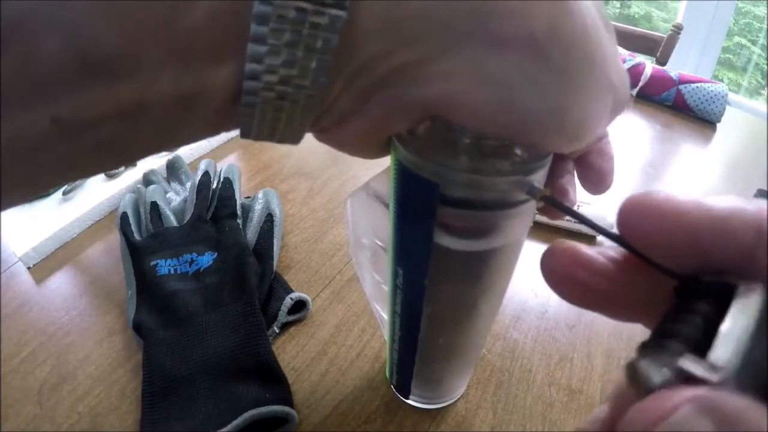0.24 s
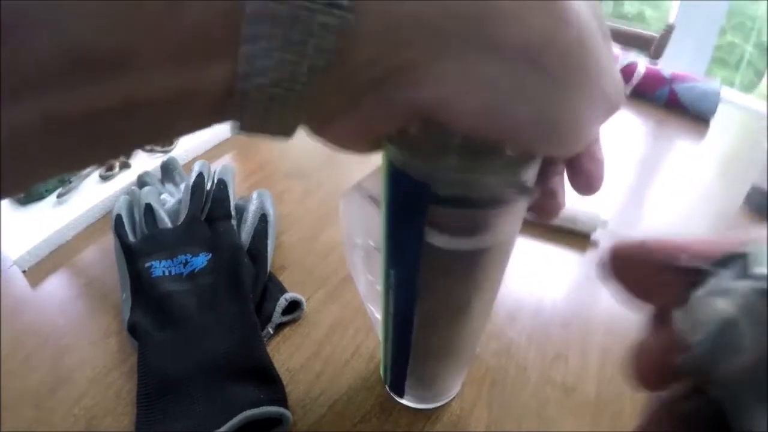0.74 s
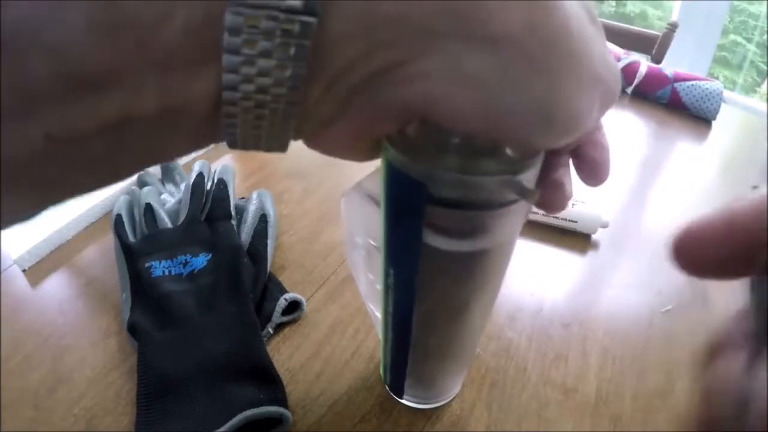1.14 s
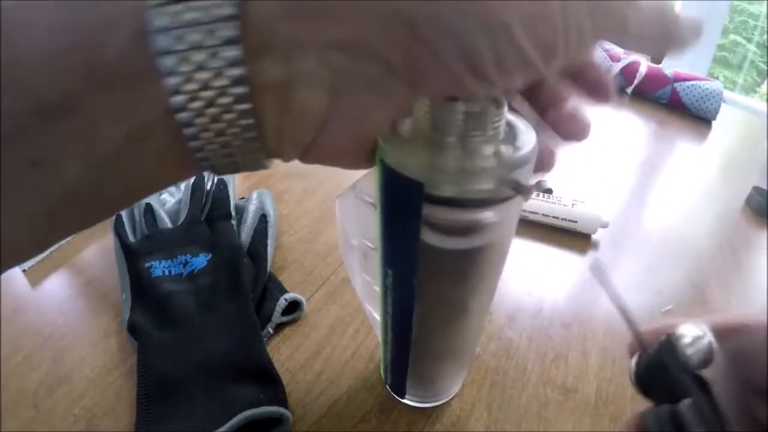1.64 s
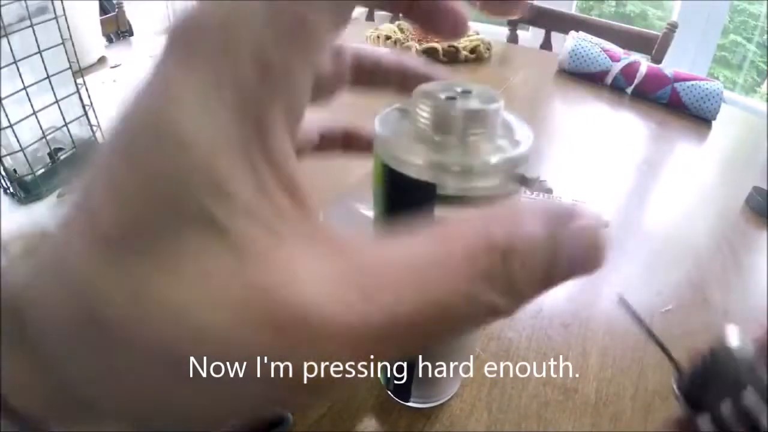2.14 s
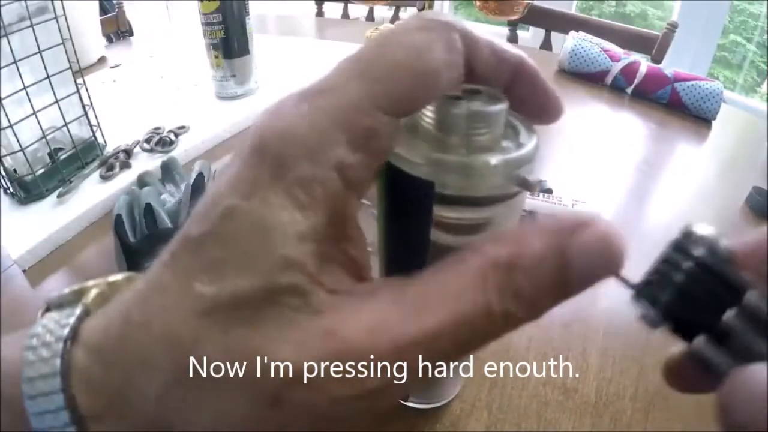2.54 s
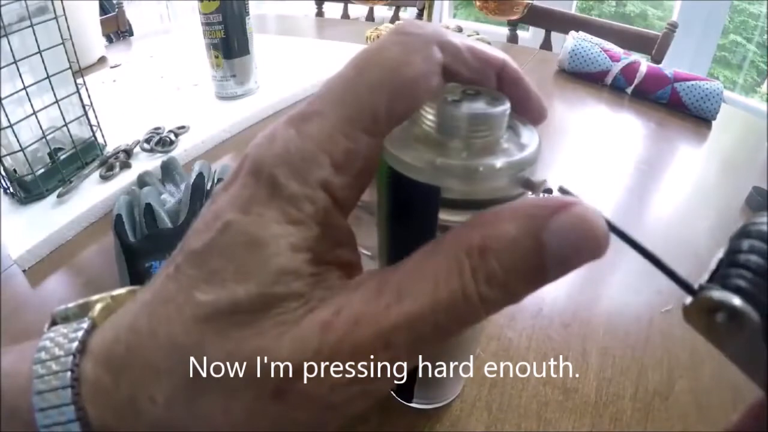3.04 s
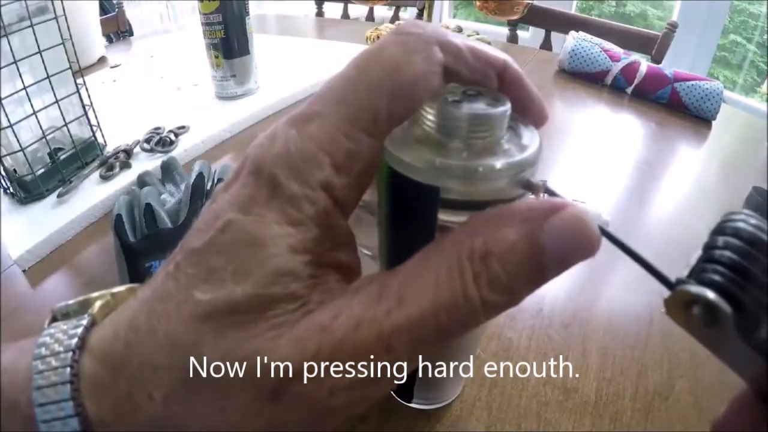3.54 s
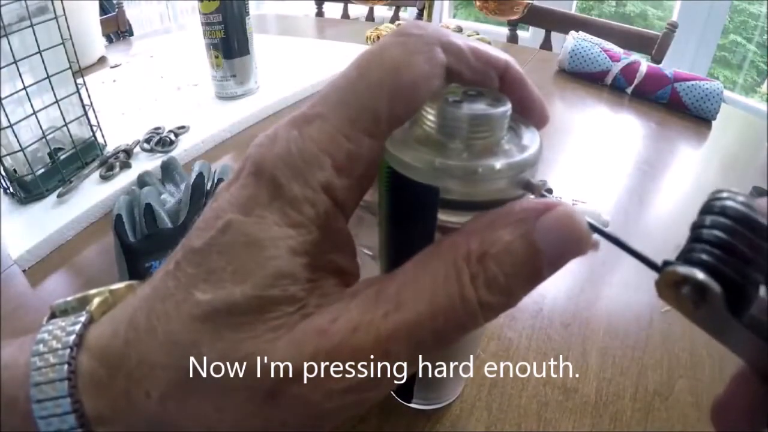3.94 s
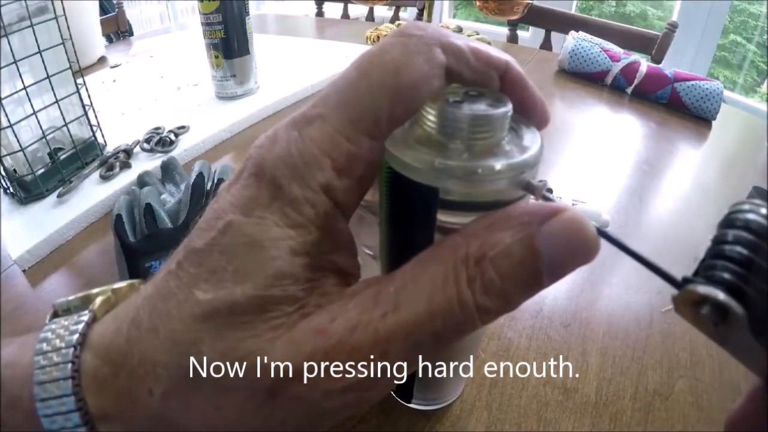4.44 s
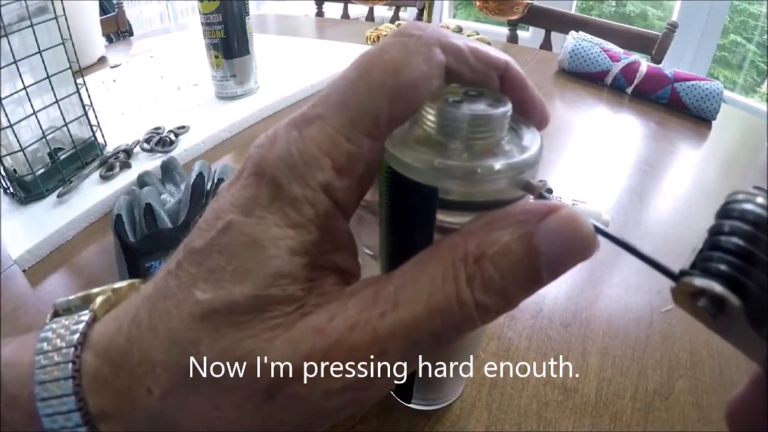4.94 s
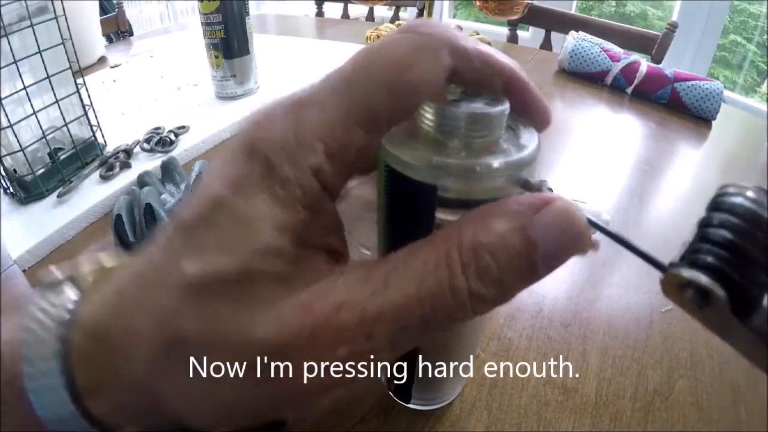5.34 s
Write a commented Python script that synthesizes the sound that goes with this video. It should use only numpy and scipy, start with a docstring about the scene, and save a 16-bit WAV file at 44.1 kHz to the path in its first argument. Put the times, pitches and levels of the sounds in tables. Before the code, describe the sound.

Faint metal clicks and scrapes of a hex key, a brief loud hollow bump close by, and soft table rumble indoors.

```python
"""In a quiet room, a hand works a folding hex key at a small screw on a plastic cap, beside a camera.
Brief contacts excite the steel's normal modes as ticks; stick-slip friction drives them as scrapes.
Knocks of the hand ring the hollow camera housing and crack against its shell.
Handling forces the table's low modes into a rumble, over a steady room tone."""
import sys
import numpy as np
from scipy import signal
from scipy.io import wavfile
from scipy.ndimage import uniform_filter1d

SR = 44100
rng = np.random.default_rng(int(sys.argv[2]) if len(sys.argv) > 2 else 0)


def int16_out(signal):
    """Quantize to a 16-bit WAV file."""
    q = np.round(np.clip(np.atleast_2d(signal).T, -1, 1) * 32767)
    wavfile.write(sys.argv[1], SR, q.astype(np.int16))


N = 246959

# normal modes of the steel key: f/Hz, nominal bandwidth/Hz, relative level/dB
STEEL_MODES = [(1300, 450, -5), (1900, 450, -5), (2550, 350, -3), (3200, 350, -2), (3850, 350, 0),
               (4600, 380, -1), (5200, 330, -1), (6200, 550, -4), (7500, 550, -5), (8600, 380, -1),
               (9800, 550, -5), (10600, 450, -5), (11600, 650, -4), (12900, 750, -3), (14300, 950, -5)]


def gain_of(db):
    return 10 ** (np.asarray(db) / 20)


def unit_rms(x):
    return x / np.sqrt(np.mean(x ** 2) + 1e-20)


def resonate(x, hz, width):
    """Resonance: two like damped oscillators in cascade, each of about unit gain at its peak."""
    r = np.exp(-np.pi * width / SR)
    for _ in range(2):
        x = 2 * signal.lfilter([1 - r], [1, -r * np.exp(2j * np.pi * hz / SR)], x).real
    return x


def coupling(hz, centre_hz, octaves):
    """Selective excitation: a mode's weight falls in a bell curve about the pitch driven hardest."""
    return np.exp(-.5 * (np.log2(hz / centre_hz) / octaves) ** 2)


def room_tone():
    """Ambient noise: a steady random spectrum with faint drifting patches."""
    # background spectrum: f/Hz, relative spectral level/dB
    spectrum = [(12, -28.5), (20, 8.5), (74, -4), (98, -13), (158, -16.5), (177, -9), (204, -20),
                (241, -16), (527, -26), (849, -24), (2460, -33.5), (14700, -46.5), (16000, -76)]
    frames, hz = N // 256 + 5, np.fft.rfftfreq(1024, 1 / SR)
    real, imag, patches = rng.standard_normal((frames, 513, 3)).T
    patches = unit_rms(uniform_filter1d(uniform_filter1d(patches, size=20, axis=0), size=8, axis=1))
    f, db = np.transpose(spectrum)
    colour_db = np.interp(np.log(hz + 1), np.log(f + 1), db)[:, None]
    bins = (real + 1j * imag) * gain_of(colour_db + 1.3 * patches)
    return gain_of(-52) * unit_rms(signal.istft(bins, nperseg=1024, noverlap=768)[1][:N])


def table_rumble():
    """Forced vibration: lumpy pushes drive the table's modes; bustle and jolts add in power."""
    # slow bustle of the hands: t/s, level/dB
    handling = [(0, -71), (.45, -60.5), (.62, -50.5), (1.05, -62.5), (1.5, -54), (1.7, -61.5), (1.85, -55),
                (2.25, -68), (2.36, -57.5), (2.9, -62.5), (3.1, -77), (4.9, -77.5), (5.1, -62),
                (5.4, -58.5), (5.6, -45)]
    # jolts of the table: t/s, level/dB, deep modes re upper modes/dB, T60/s
    jolts = [(0.256, -42, 0, 0.35), (0.502, -49, 7, 0.78), (.672, -45, 7, 0.78), (.728, -34.5, -5, 0.24),
             (.845, -31, 2.5, 0.2), (1.913, -48.5, 2, 1), (2.508, -45.5, 2, 0.58), (2.758, -48, -6, 0.46),
             (5.446, -46, 0.5, 0.35), (5.538, -41, 11.5, 0.43), (5.575, -41, -5, .4)]
    # modes of the table, the two deep ones first: f/Hz, nominal bandwidth/Hz, relative level/dB
    table_modes = [(73, 78, 4), (131, 24, 4), (213, 70, 3), (311, 52, 0.5), (430, 120, -17.5)]
    rise_s, bustle_deep_db = .006, 2.5
    t = np.arange(N) / SR
    bustle = gain_of(np.interp(t, *np.transpose(handling)))
    power = np.array([bustle, gain_of(bustle_deep_db) * bustle]) ** 2
    for s, db, deep_db, t60 in jolts:
        age = np.maximum(t - s, 0)
        decay = gain_of(np.array([[db], [db + deep_db]]) - 60 * age / t60)
        power += (np.minimum(age / rise_s, 1) * decay) ** 2
    upper_gain, deep_gain = np.sqrt(power)
    force = rng.standard_normal(N)
    force *= gain_of(3.5 * unit_rms(uniform_filter1d(rng.standard_normal(N), size=500)))  # lumps
    wood = [gain_of(db) * resonate(force, hz, 1.06 * width) for hz, width, db in table_modes]
    return upper_gain * unit_rms(sum(wood[2:])) + deep_gain * unit_rms(sum(wood[:2]))


def steel_ticks():
    """Impact excitation: a short gritty contact rings the steel modes around a low and a treble pitch."""
    # contacts: t/s, relative level/dB, low f/Hz, treble re low/dB, treble f/Hz, contact time scale/ms
    contacts = [(.2554, -38, 3480, -11, 8900, 0.39), (0.2617, -30, 3030, -13, 7600, 1.03),
                (.496, -40.5, 4340, 1, 12600, 1.4), (0.5037, -31, 5940, -0.5, 8440, 1.6),
                (0.5162, -39, 5740, 2.5, 8400, 1.7), (0.546, -50, 3980, -2, 8800, .8),
                (0.5585, -46.5, 3150, -22, 10100, 1.1), (.6819, -44, 3150, -7.5, 8500, 2.8),
                (.696, -47.5, 5500, -8, 9500, 1.4), (.7711, -35.5, 4500, -22, 9050, 0.61),
                (0.7787, -47, 3660, 3.5, 7800, 1.2), (0.809, -25.5, 2150, -24, 8450, 0.69),
                (0.875, -54, 3150, -3, 8450, 1), (0.899, -40.5, 3630, -4.5, 8450, 1.75),
                (.925, -45.5, 2750, -8, 9100, 0.73), (.9916, -38.5, 4140, -6.5, 8750, 1.5),
                (1.0932, -47, 3700, -11.5, 9100, 0.76), (1.1362, -41.5, 3280, -7, 7400, 1),
                (1.2087, -42, 2960, -2, 8000, 1.1), (1.2282, -45.5, 3670, -7, 8800, 0.69),
                (1.267, -47.5, 3590, -13, 8800, 1.6), (1.296, -38.5, 3600, -7.5, 8450, 1.8),
                (1.3368, -42.5, 3190, -14, 8300, 1.1), (1.3777, -39, 3240, -5, 8470, 4.1),
                (1.3928, -43, 4360, -26.5, 8550, 3.5), (1.422, -47, 3810, -29, 8140, 0.65),
                (2.117, -43.5, 3060, -5.5, 9400, 1.55), (2.2548, -43, 2800, -3, 7500, 2.1),
                (2.4364, -23.5, 4120, 1.5, 9800, 2), (2.501, -42, 2670, -20, 8800, 3),
                (2.5145, -46, 2780, -17, 8800, 1.1), (2.562, -48.5, 3100, -11, 8800, 3.9),
                (2.974, -52, 3170, -7, 8800, 1.42), (3.1188, -48.5, 3200, -20, 8800, 2.5),
                (5.018, -49, 5200, -15.5, 8300, 1.1), (5.0682, -34, 4740, -9, 9000, 1.9),
                (5.0742, -33.5, 2400, -14, 9000, 2.4), (5.1454, -54, 5880, -2.5, 8500, 1),
                (5.1744, -46, 5810, -4, 9670, 1.23), (5.1794, -32.5, 5100, -1, 8330, 0.65),
                (5.241, -44.5, 4880, -13.5, 8400, 1.2), (5.2769, -52, 4550, -11.5, 8900, 1.16),
                (5.382, -48.5, 1900, -20.5, 8800, 0.99), (5.3968, -47.5, 2700, -7.5, 11570, 2.5),
                (5.4163, -34.5, 4690, -8.5, 11500, 0.9), (5.474, -40, 4860, 0, 8860, 2.7),
                (5.491, -50, 5140, -9, 8200, 1.3), (5.546, -55, 5030, -2, 8200, 0.84)]
    low_octaves, treble_octaves, skirt_db = .54, .13, -16.5
    out, t = np.zeros(N), np.arange(1500) / SR
    grit = rng.standard_normal((len(contacts), len(t)))
    tunings = 1 + .04 * rng.uniform(-1, 1, (len(contacts), len(STEEL_MODES)))  # each tick sounds a different key of the set, its modes slightly shifted
    for (s, db, low_hz, treble_db, treble_hz, ms), noise, tuning in zip(contacts, grit, tunings):
        u = t * 1000 / ms
        force = noise * u ** 2 * np.exp(-3 * u)
        force *= 1 + .67 * np.exp(-((u - .8) / .15) ** 2)  # the hardest instant of the strike
        force += np.linalg.norm(force) / 300 * noise[::-1] * np.exp(-t / .01)  # faint room response
        modes = [(hz, gain_of(mode_db) * np.sqrt(w) * unit_rms(resonate(force, hz * shift, 1.8 * w)))
                 for (hz, w, mode_db), shift in zip(STEEL_MODES, tuning)]
        low = sum(coupling(hz, low_hz, low_octaves) * mode for hz, mode in modes[:8])
        treble = sum((coupling(hz, treble_hz, treble_octaves) + gain_of(skirt_db)) * mode
                     for hz, mode in modes[8:])
        tick = low / np.linalg.norm(low) + gain_of(treble_db) * treble / np.linalg.norm(treble)
        add(out, s, gain_of(db + 12.5) * tick)
    return out


def steel_scrapes():
    """Stick-slip friction: tiny uneven slips drive the steel modes, fading as the hand slows."""
    # strokes: t/s, duration/s, level before fading/dB, centre f/Hz, spread/octaves
    strokes = [(0.257, .1, -65.5, 2500, 1.3), (0.486, 0.11, -59, 5930, 1.6), (0.765, 0.029, -57, 4470, .74),
               (0.788, 0.15, -62, 3900, 0.56), (1.225, 0.079, -62, 4180, 0.9),
               (1.326, 0.059, -59.5, 4000, .72), (1.374, 0.045, -52, 4730, .68),
               (1.399, 0.1, -62.5, 2865, .57), (2.291, 0.38, -63.5, 1820, .53),
               (2.439, 0.091, -62.5, 9700, 0.48), (2.528, 0.046, -57.5, 2880, 0.26),
               (5.062, 0.072, -60, 3030, 1.1), (5.184, 0.074, -56.5, 6670, .55),
               (5.253, .066, -64, 6060, .7), (5.449, 0.09, -62.5, 8500, 0.77),
               (5.507, 0.23, -67, 5600, 0.88)]
    slips_per_s, rolloff_hz, fade_db = 2600, 10500, -3.5
    slips = gain_of(3.6 * np.minimum(rng.exponential(1, N), 5))
    slips *= (rng.random(N) < slips_per_s / SR) * rng.choice([-1, 1], N)
    modes = [(hz, gain_of(db) / (1 + (hz / rolloff_hz) ** 4) * resonate(slips, hz, 1.43 * width))
             for hz, width, db in STEEL_MODES]
    out = np.zeros(N)
    for s, duration, db, centre_hz, octaves in strokes:
        start = round(s * SR)
        u = np.linspace(0, 1, round(duration * SR))[:N - start]
        rub = sum(coupling(hz, centre_hz, octaves) * mode[start:][:len(u)] for hz, mode in modes)
        envelope = np.minimum(u / .12, 1) * np.minimum((1 - u) / .4, 1)
        add(out, s, gain_of(db + fade_db * u) * envelope * unit_rms(rub))
    return out


def housing_knocks():
    """Damped free vibration: a soft push rings the hollow housing, its rough edge sounds the shell."""
    # knocks: t/s, relative level/dB, thump gain/dB, crack gain/dB, damping factor of the grip
    knocks = [(0.2633, -47, 6, -9, 0.29), (.508, -48.5, 4, 2.5, 0.49), (.6775, -25.5, -13, -17, 0.54),
              (.684, -14.5, -11, -34, 5.4), (.7182, -14.5, -47, -16.5, 1.9), (.7203, -18.5, 11, -32, 2.8),
              (0.727, -35, 1.5, -20, 0.96), (0.8093, -1, -8.5, -24, 0.74), (0.8313, -11.5, 5.5, -15, 5.3),
              (0.8347, -17.5, -3.5, -19, 0.46), (0.8406, -6, -10.5, -29.5, 0.84),
              (0.846, -10.5, -14, -29, 2.2), (.850, -28, 2.5, -10.5, 1.6), (.857, -48.5, 15.5, -5, 2.5),
              (1.70, -49.5, 0, -24.5, 0.74), (2.513, -56, 7, -30, 1.5), (5.079, -48.5, 5, -3.5, 0.69),
              (5.448, -51, 15, -21.5, 1.5), (5.5496, -45.5, 16, -6, 1.9)]
    # five thump modes, then two cavity modes: f/Hz, relative level/dB, T60 at unit damping/s
    housing_modes = [(62.28, -12.5, 0.092), (170, -22.5, .06), (284, -9.5, 0.15), (405, -2, .04),
                     (435.1, -14, 0.15), (660, -4, 0.02), (801.4, 1, 0.045)]
    # shell resonances: f/Hz, nominal bandwidth/Hz, relative level/dB
    shell_modes = [(1272, 83, -4.5), (1612, 290, 2.5), (1940, 330, -3), (2180, 259.4, -2.5),
                   (2700, 320, -9), (3360, 440, -19)]
    out, t = np.zeros(N), np.arange(8000) / SR
    push = np.hanning(round(.0011 * SR))
    grit = rng.standard_normal((len(knocks), len(t))) * t * np.exp(-t / .00202)
    for (s, db, thump_db, crack_db, damping), noise in zip(knocks, grit):
        modes = [gain_of(mode_db - 60 * damping * t / t60) * np.sin(2 * np.pi * hz * t)
                 for hz, mode_db, t60 in housing_modes]
        swell = 1.8 * (1 - np.exp(-t / .00099))  # the air inside takes a cycle or two to build up
        swell *= np.exp(-(damping * t / .011) ** 2)  # the closing hand then smothers it
        hollow = swell * sum(modes[5:]) + gain_of(thump_db) * sum(modes[:5])
        body = np.convolve(hollow, push / push.sum())[:len(t)]
        crack = sum(gain_of(mode_db) * resonate(noise, hz, width) for hz, width, mode_db in shell_modes)
        knock = body + gain_of(crack_db) * crack / abs(crack).max()
        add(out, s - .0004, gain_of(db) * knock)
    # the microphone's low cut thins the knocks' deepest bass
    return signal.lfilter(*signal.butter(2, 45, "high", fs=SR), out)


def add(mix, s, sound):
    part = mix[round(s * SR):][:len(sound)]
    part += sound[:len(part)]


def scene():
    """Superposition: the sources sum in one channel."""
    return (room_tone() + steel_ticks() + housing_knocks() + table_rumble() + steel_scrapes())[None]


def record(dry):
    """Band limiting: a linear-phase low-pass removes the highest treble."""
    cutoff_hz = 15400
    return signal.oaconvolve(dry, signal.firwin(511, cutoff_hz, window=("kaiser", 9), fs=SR)[None], "same")


dry = scene()
out = record(dry)
int16_out(out)
```